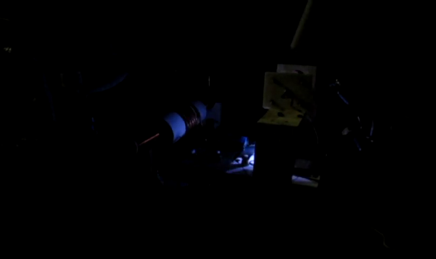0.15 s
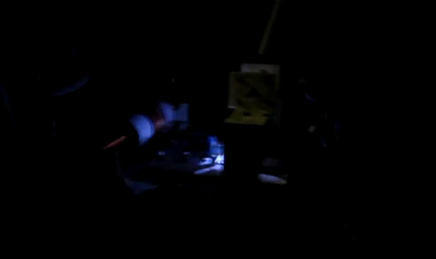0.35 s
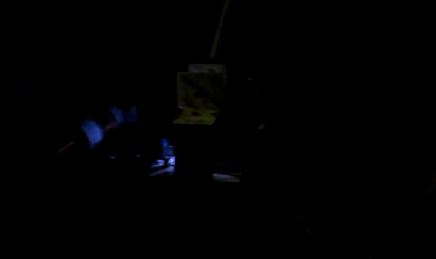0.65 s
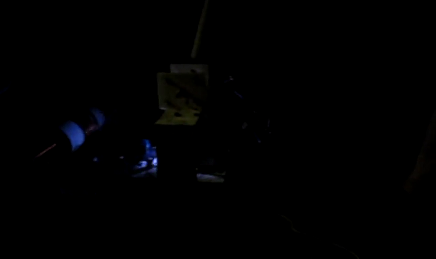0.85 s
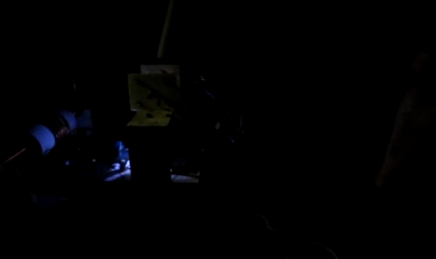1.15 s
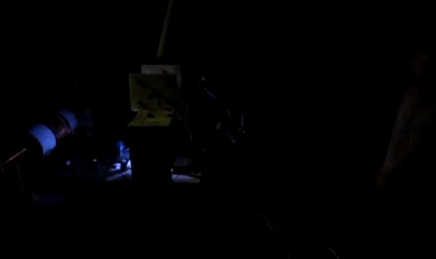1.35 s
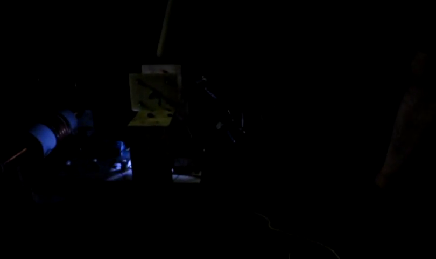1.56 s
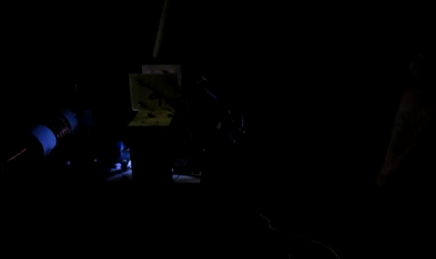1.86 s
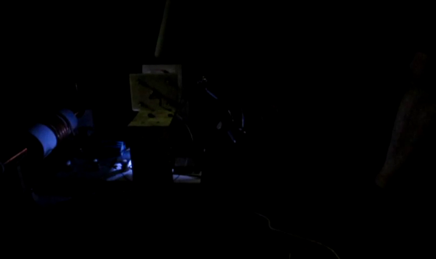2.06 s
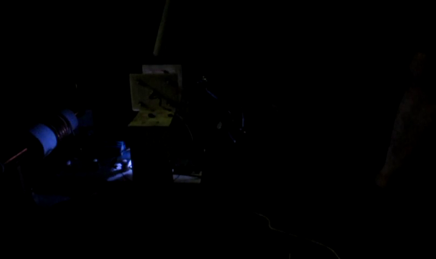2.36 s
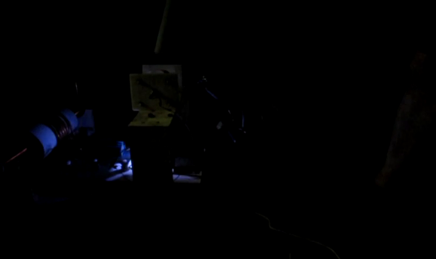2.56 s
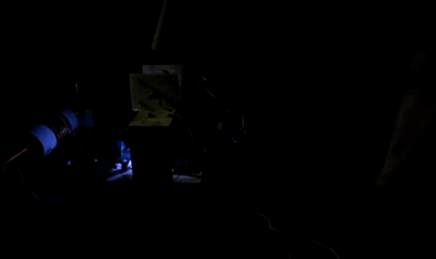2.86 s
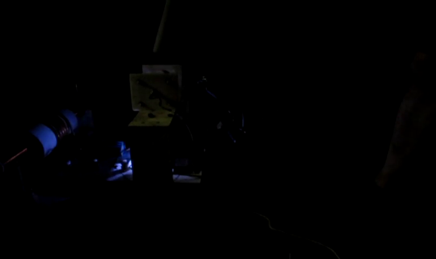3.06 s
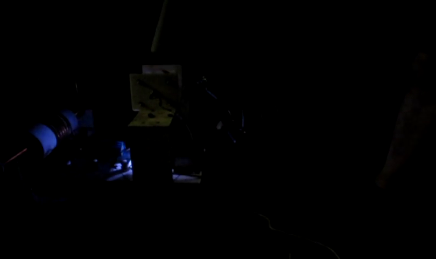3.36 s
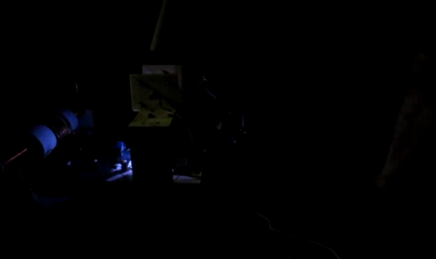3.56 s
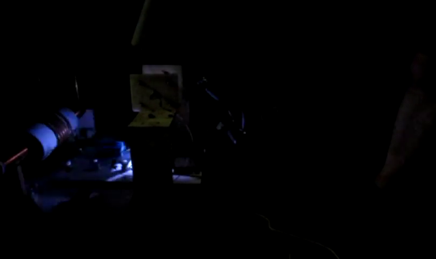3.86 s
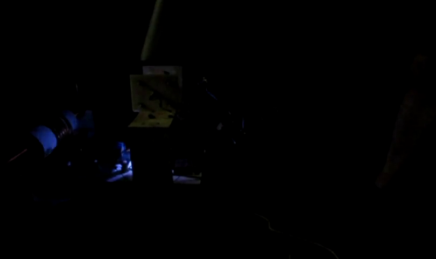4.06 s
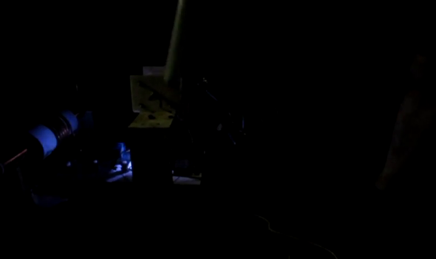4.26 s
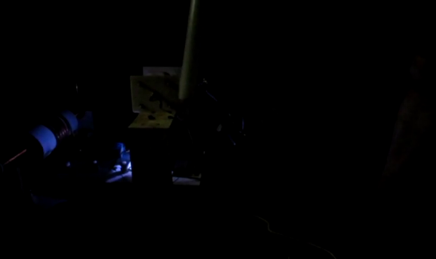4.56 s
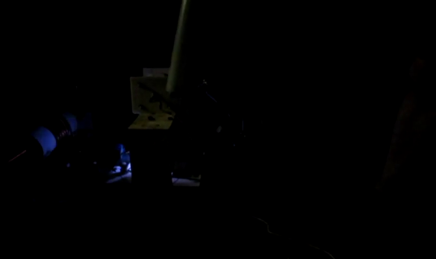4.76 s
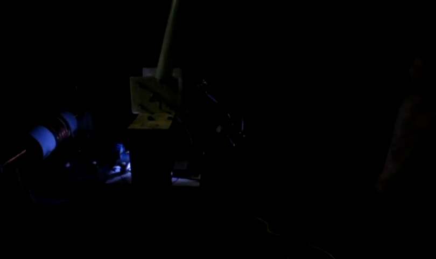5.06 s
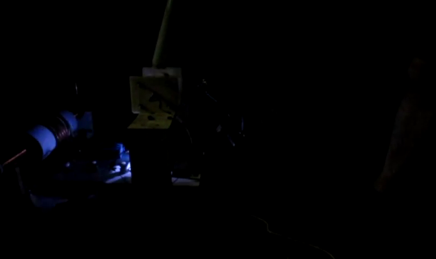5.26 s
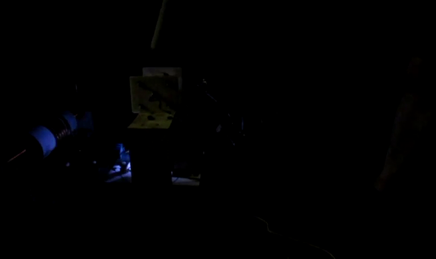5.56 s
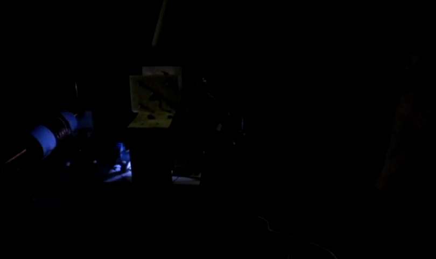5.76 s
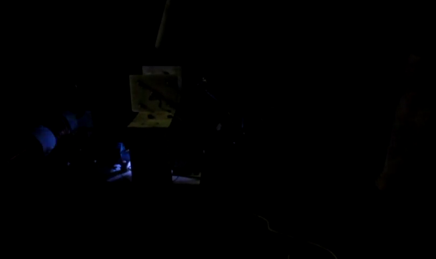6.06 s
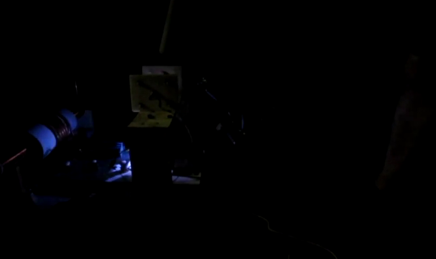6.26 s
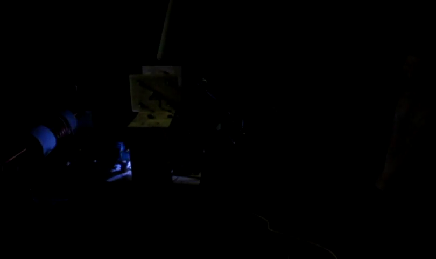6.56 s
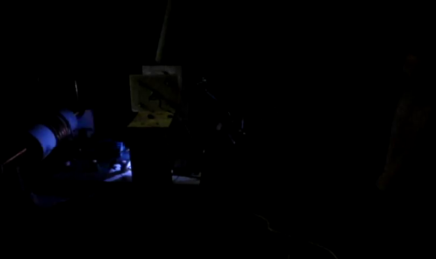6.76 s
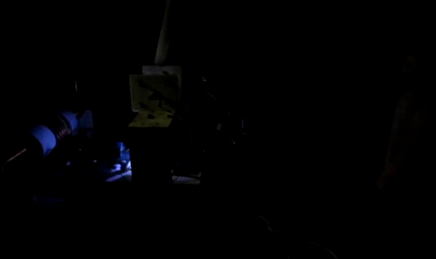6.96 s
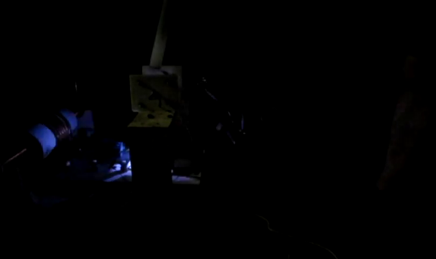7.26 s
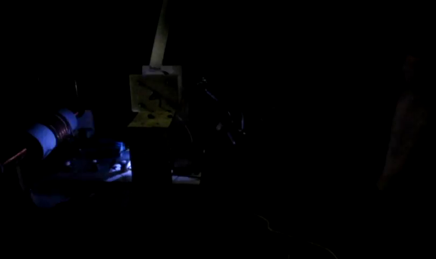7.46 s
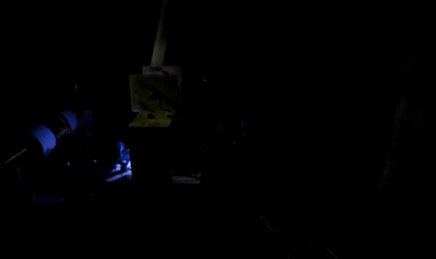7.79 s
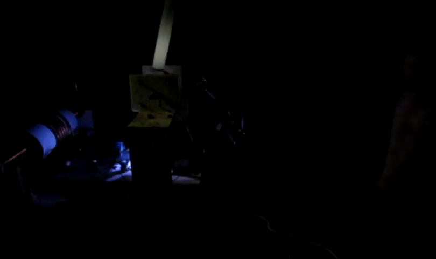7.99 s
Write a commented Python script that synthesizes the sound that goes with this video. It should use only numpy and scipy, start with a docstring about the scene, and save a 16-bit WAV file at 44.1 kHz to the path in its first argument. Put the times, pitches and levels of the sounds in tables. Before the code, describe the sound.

From 0 to about 8.1 seconds, an electrical discharge sizzles continuously, already running at the start and cut off still running. Each mains cycle, sixty per second, brings about three tiny sharp cracks in two groups, blurred by bench echoes and a short small-room tail into a harsh, bright, buzzing hiss. Energy lies mostly from 3 to 12 kilohertz, with little bass. The level is nearly steady, but tiny flurries of extra snaps, under a tenth of a second, roughen it, as near 0.6, 1.9, 2.5 and 2.75 seconds. Small dips come between, notably near 1.4. Around 4.95 to 5.4 the crackle thickens and its rhythm shifts slightly; flurries are frequent from 6 to 7.9, with another rhythm shift near 7.85. Very faint hum, patchy low noise and two soft microphone bumps near 5.0 and 5.3 are virtually masked. Close, moderately wide stereo.

```python
"""In a small room, a mains-fed spark gap fires on a bench before a microphone.
Each half of the mains cycle breaks the gap down, and restrikes may follow a millisecond or so later.
Every spark is an impulse shaped into a short N-like crack; bench echoes, resonances and decaying noise
blur the cracks into a buzzing sizzle. Wavering sines make a faint hum at mains harmonics, over patchy
low noise, and two soft bumps reach the microphone body."""
import sys
import numpy as np
from scipy import signal
from scipy.fft import rfft, irfft, next_fast_len
from scipy.io import wavfile
from scipy.ndimage import uniform_filter1d

SR = 44100
rng = np.random.default_rng(int(sys.argv[2]) if len(sys.argv) > 2 else 0)


def materialize(psi):
    """Save the field psi as 16-bit PCM at rate SR to the path in sys.argv[1].

    A 1-D psi becomes a single channel; in a 2-D psi each row is a channel.
    """
    bounded = np.clip(np.atleast_2d(psi).T, -1, 1)
    quanta = np.round(bounded * 32767).astype(np.int16)
    wavfile.write(sys.argv[1], SR, quanta)


N = 358524

# Low tones at mains harmonics, centre levels: pitch_hz, level_db (rms)
HUM_LINES = [(180, -87.5), (240, -90), (300, -75), (360, -74), (540, -65)]
# Lowest hum line, which comes and goes: time_s, level_db (rms)
LOW_HUM_LEVEL = [(0.0, -90), (0.32, -84), (0.38, -103), (0.61, -78), (0.84, -108), (0.88, -83), (1.81, -84),
                 (2.2, -76), (2.24, -101), (2.35, -76), (3.21, -80), (3.28, -109), (3.37, -79), (4.94, -83),
                 (4.98, -73), (5.3, -87), (6.29, -81), (6.36, -110), (6.52, -87), (7.88, -80), (8.04, -110),
                 (8.13, -86)]
LOW_HUM_HZ = 120
HUM_WAVER_DB, LOW_HUM_WAVER_DB, HUM_ROUGH_TURNS = 4.5, 1.8, .16  # turns of phase
FLOOR_DB, FLOOR_PATCHY_DB = -86.5, 20  # upper rms level of a noise band; depth of its drops

# Soft bumps on the microphone body: centre_s, pitch_hz, peak_db, length_s (between 1/e points)
SOFT_BUMPS = [(5.01, 85, -69, .08), (5.34, 50, -74, .06)]

# Bench and apparatus echoes: delay_ms, left_gain, right_gain (relative)
BENCH_ECHOES = [(0.0, 1.14, 1.16), (0.215, 0.44, 0.35), (0.42, 0.23, 0.15), (0.519, 0.24, 0.29),
                (0.944, -0.2, -0.32), (1.032, -0.17, -0.4), (1.154, 0.32, 0.53), (1.426, -0.26, -0.23),
                (1.562, 0.22, 0.22), (1.967, -0.41, -0.42), (2.117, -0.5, -0.42), (2.304, 0.3, 0.33),
                (2.443, 0.19, 0.27), (2.8, 0.21, 0.34), (3.03, 0.26, 0.24), (3.645, 0.27, 0.24),
                (4.785, -0.18, -0.21), (6.276, -0.18, -0.2)]
# Diffuse sound before the stereo width is set: pitch_hz, side_minus_mid_db
DIFFUSE_SIDE = [(100, -8), (300, -11), (600, -9), (1300, -12), (1800, -5), (2400, 2), (4400, -4.5),
                (8000, -5), (15000, -4.5)]
# Broad width of the whole spark sound: pitch_hz, side_minus_mid_db
STEREO_WIDTH = [(60, -10), (200, -11), (380, -15), (700, -14), (1290, -11), (1650, -14), (2300, -1),
                (3800, -3), (4700, -8), (8100, -8), (15000, -8)]
# Broad stereo balance of the spark sound: pitch_hz, left_minus_right_db
STEREO_BALANCE = [(1500, -.2), (2400, -1.2), (4000, -.2)]
# Resonances and notches: pitch_hz, width_hz, level_db
RESONANCES = [(325, 71, 9.5), (383, 26, 6), (426, 50, -21), (520, 320, 0), (635, 26, -12.5), (840, 71, 5.5),
              (1075, 43, 3), (1485, 49, -1.5), (1581, 155, 6.5), (2270, 170, 3.5), (2312, 44, -15.5),
              (2640, 130, 2.5), (2982, 110, -9.5), (3110, 56, 2), (4100, 43, -5.5), (4415, 230, 3.5),
              (5360, 140, 5), (5640, 92, -8.5), (6820, 250, 0), (6840, 80, 2.5), (7855, 240, 7),
              (7970, 75, -8), (8300, 120, 2), (8520, 120, -5), (9620, 270, 3.5), (12300, 100, -1),
              (13700, 550, 5.5)]
# Relative spectrum of an arriving spark: pitch_hz, level_db
CRACK_SPECTRUM = [(40, -80), (100, -70), (240, -50), (290, -43), (500, -24), (1000, -20), (1500, -18),
                  (2000, -14), (3000, -7.5), (4500, -4.5), (6000, -3), (8000, -3), (10000, -3), (12000, -6),
                  (14000, -8.5), (15700, -8)]
# Diffuse levels are relative to the echo gains
CLUTTER_DB, CLUTTER_T60_S = -28, .045
ROOM_DB, ROOM_T60_S = -23.5, .18
DIFFUSE_RISE_S = .001
SPOTS = 8  # places on the electrodes where a spark may strike
SPOT_SHARE, TAIL_SPOT_SHARE = .6, .3  # power shares of clutter and tail that differ by spot
MODE_SHIFT, MODE_DEPTH_SPREAD = .15, .15  # by spot: in resonance widths; as a share of level_db
EVEN_HZ = 160  # echoes ripple the spectrum only more finely than this
COLOUR_HZ = (160, 230, 330, 470, 680, 1000, 1500, 2300, 3500, 5500, 9000)  # bands that surge and sink
COLOUR_DRIFT_DB, BASS_DRIFT_DB, BASS_HZ = .4, 7, 300  # bands below BASS_HZ flicker more

MAINS_HZ = 60.015
# Usual first breakdown in each half of the mains cycle: first_half_ms, second_half_ms
BREAKDOWN_MS = (1.65, 12.55)
# Usual spark power: time_s, power_db
GAP_POWER = [(0, -19.5), (.3, -21.5), (.55, -20), (.8, -21), (1.1, -20), (1.45, -19.5), (1.75, -20),
             (2.1, -19), (2.5, -20), (2.9, -20), (3.2, -19.5), (3.55, -19), (3.85, -19), (4.1, -20.5),
             (4.4, -20), (4.7, -19), (4.9, -19), (5.2, -20), (5.6, -20.5), (5.9, -20.5), (6.2, -20.5),
             (6.5, -21), (6.8, -20.5), (7.1, -19), (7.4, -20), (7.8, -21), (8.13, -19.5)]
# First half strikes later and second half earlier by: time_s, lag_ms
STRIKE_LAG = [(0, .3), (.8, .1), (4.9, 0), (5.05, 1.4), (5.25, 2.6), (5.45, .4), (5.6, 0), (7.6, .2),
              (7.85, 2.0), (8.0, .3), (8.13, .3)]
# Spells of altered power; those above 1 dB also bring many restrikes: start_s, length_s, rise_db
FLURRY_SPELLS = [(.033, 0.029, 1), (.142, 0.028, 1.5), (.267, .03, 1), (.45, 0.023, 1.5),
                 (.567, 0.029, 2.5), (.765, 0.018, 0.5), (.9, .02, -0.5), (.983, 0.026, 2),
                 (1.57, 0.079, 0.5), (1.883, 0.047, 2), (1.966, 0.015, 0), (2.499, 0.04, 2.5),
                 (2.749, 0.016, 3), (2.8, .035, 1), (3.43, 0.037, 0.9), (3.53, 0.037, 0.1),
                 (3.566, 0.014, 2), (3.682, 0.016, 2.5), (3.74, 0.02, 1), (3.916, 0.054, 1),
                 (4.032, 0.013, 1.5), (4.065, 0.019, 1), (4.115, .017, 1.5), (4.345, 0.018, 2),
                 (4.95, 0.027, 2.6), (4.98, 0.059, 2.5), (5.215, 0.044, 2), (5.332, 0.045, 1.5),
                 (5.4, 0.045, 2), (5.51, .03, 1), (5.565, 0.015, 1.5), (6.05, 0.043, 1.5),
                 (6.215, 0.043, 3), (6.282, 0.052, 1), (6.348, 0.035, 2.5), (6.54, 0.023, 2.5),
                 (6.598, 0.026, 1.5), (6.81, .02, 1), (6.848, 0.043, 1.5), (7.198, 0.031, 1),
                 (7.348, 0.046, 1), (7.531, 0.046, 2), (7.598, 0.014, 3), (7.748, 0.029, 1.5),
                 (7.831, 0.032, 2), (8.065, 0.034, 1)]
# Short dips in the level of the sizzle: start_s, length_s, drop_db
DIP_SPELLS = [(.49, 0.045, 0.5), (.55, 0.024, 3), (.617, 0.073, 2.5), (1.316, 0.046, 2), (1.383, 0.024, 5),
              (1.7, 0.091, 1.5), (2.249, 0.04, 2), (2.349, 0.039, 1.5), (2.616, 0.039, 0.5),
              (2.699, 0.064, 2), (2.849, 0.029, 0.5), (2.999, 0.037, 1), (3.215, 0.027, 2),
              (3.71, 0.027, 1.5), (3.766, 0.025, 3), (3.866, 0.044, 2.5), (3.966, 0.063, 1),
              (4.549, 0.034, 3), (4.76, 0.029, 3), (5.099, 0.032, 0), (5.14, 0.041, 1.5), (5.449, .033, 0),
              (5.682, 0.045, 2), (5.782, 0.05, 2), (5.948, 0.074, 1.5), (6.098, 0.06, 1),
              (6.715, 0.09, 2.5), (6.915, 0.055, 2.5), (7.065, 0.089, 3.3), (7.498, 0.028, 0),
              (7.681, 0.049, 0.5), (7.798, 0.025, -0.5), (7.948, 0.099, 1)]
POWER_SCATTER_DB = .49  # from one mains cycle to the next
SPARKS_PER_CYCLE, SPARKS_SCATTER = 3.0, .6
SPARKS_FOLLOW_POWER = .6  # dB of spark count per dB of power
FLURRY_SPARKS_PER_DB = 1.7
RESTRIKE_MS, RESTRIKE_SPREAD = 1.25, .45  # median wait; spread of its natural logarithm
STRIKE_JITTER_MS = .26
SIZE_SCATTER_DB, RESTRIKE_DB = 1.2, -1.6  # a restrike is weaker than the first strike
SPOT_STAY = .4  # chance of striking the settled spot; otherwise any spot is drawn
SPOT_MOVES_PER_S = 6  # settled spot redrawn at this rate

TOP_HZ = 15720
CEILING = 1.1  # peaks are rounded towards this amplitude


def undb(db):
    """Amplitude ratio: 20 dB is a factor of ten."""
    return 10 ** (np.asarray(db) / 20)


def curve(table, s):
    """Piecewise-linear interpolation in time."""
    return np.interp(s, *np.transpose(table))


def colour(table, hz):
    """Spectral gain: decibels interpolated on a log-frequency axis."""
    f, db = np.transpose(table)
    return undb(np.interp(np.log(hz + 1), np.log(f), db))


def clicks(s, size, count):
    """Band-limited impulses: windowed sincs place each one between samples."""
    out = np.zeros(count)
    at = np.round(s * SR).astype(int)[:, None] + np.arange(-8, 9)
    off = at - s[:, None] * SR
    pulse = size[:, None] * np.sinc(off) * np.cos(np.pi * off / 18) ** 2
    inside = (at >= 0) & (at < count)
    np.add.at(out, at[inside], pulse[inside])
    return out


def walk(rate):
    """Random modulation: linear glides between normal levels set 1 / rate s apart."""
    step = int(SR / rate)
    held = np.repeat(rng.standard_normal(N // step + 1), step)
    return uniform_filter1d(held, step)[:N]


def spells(table, s):
    """Superposition in dB of the spells under way; edges fade over one mains cycle."""
    start, length, db = np.transpose(table)[..., None]
    inside_s = length / 2 - abs(s - start - length / 2)
    return (db * np.clip(inside_s * MAINS_HZ + .5, 0, 1)).sum(axis=0)


def low_noise():
    """Band-filtered noise: four low bands, nearly alike left and right, drop out independently."""
    air = 0
    for lo, hi in ((45, 90), (90, 140), (140, 200), (200, 270)):
        band = signal.butter(3, [lo, hi], "band", fs=SR, output="sos")
        mid, side = signal.sosfilt(band, rng.standard_normal((2, N)))
        stereo = (mid + .17 * side * np.array([[1], [-1]])) / mid.std()
        level_db = FLOOR_PATCHY_DB * np.minimum(walk(11), 0)
        if lo < 90:
            level_db = level_db - 9
        air = air + undb(level_db) * stereo
    return undb(FLOOR_DB) * air


def hum():
    """Mains harmonics: sines roughened by phase modulation and wavering in level."""
    t = np.arange(N) / SR
    lines = 0
    for hz, db in HUM_LINES:
        level = undb(db + HUM_WAVER_DB * np.minimum(walk(8.4), .8))
        lines = lines + level * np.sin(2 * np.pi * (hz * t + HUM_ROUGH_TURNS * walk(30)))
    level = undb(curve(LOW_HUM_LEVEL, t) + LOW_HUM_WAVER_DB * walk(9.1))
    low_line = level * np.sin(2 * np.pi * (LOW_HUM_HZ * t + HUM_ROUGH_TURNS * walk(20)))
    return np.sqrt(2) * (lines + low_line)  # a sine's peak is sqrt(2) times its rms


def bumps():
    """Gaussian envelopes on low sines make short soft thuds."""
    t = np.arange(N) / SR
    out = 0
    for centre, hz, db, length in SOFT_BUMPS:
        swell = np.exp(-(2 * (t - centre) / length) ** 2)
        out = out + undb(db) * swell * np.sin(2 * np.pi * hz * t)
    return out


def diffuse(count, clutter_share, tail_share):
    """Exponential decay of scattered sound: left and right spectra of bench clutter and room tail."""
    age = np.arange(count) / SR
    clutter = np.sqrt(clutter_share) * undb(CLUTTER_DB - 60 * age / CLUTTER_T60_S)
    tail = np.sqrt(tail_share) * undb(ROOM_DB - 60 * age / ROOM_T60_S)
    rise = np.clip(age / DIFFUSE_RISE_S, 0, 1) ** 2
    mid, side = rfft((clutter + tail) * rise * rng.standard_normal((2, count)))
    side = side * colour(DIFFUSE_SIDE, np.fft.rfftfreq(count, 1 / SR))
    return np.array([mid + side, mid - side])


def crack(hz, shift, depth):
    """N-like wave: a quarter-turn of phase makes the pulse odd, and resonances colour it."""
    modes_db = 0
    for (f, width, db), a, b in zip(RESONANCES, shift, depth):
        modes_db = modes_db + b * db / (1 + (2 * (hz - f - a * width) / width) ** 2)
    return 1j * colour(CRACK_SPECTRUM, hz) * undb(modes_db)


def sizzle_drift(spectra, hz, count, lead):
    """Spectral modulation: overlapping bands surge and sink independently."""
    out = 0
    for f, corner in zip(COLOUR_HZ, np.eye(len(COLOUR_HZ))):
        band = np.interp(np.log(hz + 1), np.log(COLOUR_HZ), corner)
        drift_db = BASS_DRIFT_DB if f < BASS_HZ else COLOUR_DRIFT_DB
        sound = irfft(spectra * band, count)[:, lead:lead + N]
        out = out + undb(drift_db * walk(10)) * sound
    return out


def room(trains):
    """Convolution with the paths from each spot: shared echoes, partly shared diffuse sound."""
    count = next_fast_len(N + SR)
    hz = np.fft.rfftfreq(count, 1 / SR)
    ms, left, right = np.transpose(BENCH_ECHOES)
    lead = 16  # samples of room for the first sinc, removed afterwards
    early = rfft([clicks(lead / SR + ms / 1000, g, count) for g in (left, right)])
    common = early + diffuse(count, 1 - SPOT_SHARE, 1 - TAIL_SPOT_SHARE)
    paths = []
    for _ in trains:
        left, right = common + diffuse(count, SPOT_SHARE, TAIL_SPOT_SHARE)
        paths.append(np.array([left + right, left - right]))  # mid and side

    # Level the paths' broad spectrum, so that the crack and width tables set it
    width = int(EVEN_HZ / hz[1])
    power = sum(abs(p) ** 2 for p in paths)
    broad = uniform_filter1d(uniform_filter1d(power, width), width)

    shift, depth = rng.standard_normal((2, len(trains), len(RESONANCES)))
    out = 0
    for train, path, a, b in zip(trains, paths, shift, depth):
        colouring = crack(hz, MODE_SHIFT * a, 1 + MODE_DEPTH_SPREAD * b)
        out = out + rfft(train, count) * path * colouring
    mid, side = out / np.sqrt(broad)
    side = side * colour(STEREO_WIDTH, hz)
    out = np.array([mid + side, mid - side])
    out = out * colour(STEREO_BALANCE, hz) ** np.array([[.5], [-.5]])
    out = sizzle_drift(out, hz, count, lead)
    # Give the sound the mean power of the spark trains
    return out * np.sqrt(np.mean(sum(trains) ** 2) / np.mean(out ** 2))


def sparks():
    """Gap breakdown: each half-cycle strikes and may restrike; one impulse train for each spot."""
    cycles = int(N / SR * MAINS_HZ) + 1
    start = np.arange(cycles) / MAINS_HZ
    middle = start + .5 / MAINS_HZ
    lag = curve(STRIKE_LAG, start) / 1000
    flurry_db = spells(FLURRY_SPELLS, middle)
    power_db = curve(GAP_POWER, middle) + flurry_db - spells(DIP_SPELLS, middle)
    power_db = power_db + POWER_SCATTER_DB * rng.standard_normal(cycles)

    # Sparks in each cycle: more with power, and many more in flurries
    total = SPARKS_PER_CYCLE * undb(SPARKS_FOLLOW_POWER * (power_db - power_db.mean()))
    total = np.clip(np.round(total + SPARKS_SCATTER * rng.standard_normal(cycles)), 2, 5)
    flurry_total = np.round(SPARKS_PER_CYCLE + FLURRY_SPARKS_PER_DB * flurry_db) * (flurry_db > 1)
    total = np.maximum(total, flurry_total).clip(2, 12)
    # An odd spark goes to the first half
    count = np.stack([np.ceil(total / 2), np.floor(total / 2)], axis=1)

    # Axes: cycle, half, spark; a second half that restrikes starts early
    early = (count[:, 1] - 1) * RESTRIKE_MS / 3000
    first = np.array(BREAKDOWN_MS) / 1000 + np.stack([lag, -lag - early], axis=1)
    time_chance, size_chance = rng.standard_normal((2, cycles, 2, 6))
    wait = RESTRIKE_MS / 1000 * np.exp(RESTRIKE_SPREAD * time_chance)
    wait[..., 0] = STRIKE_JITTER_MS / 1000 * time_chance[..., 0]
    s = start[:, None, None] + first[..., None] + np.cumsum(wait, axis=2)

    # Sparks share the power, evened over three cycles
    order = np.arange(6)
    fires = order < count[..., None]
    size = undb(SIZE_SCATTER_DB * size_chance + RESTRIKE_DB * (order > 0)) * fires
    spent = uniform_filter1d((size ** 2).sum(axis=(1, 2)), size=3)
    size = size * (undb(power_db) / np.sqrt(spent))[:, None, None]

    settled = rng.integers(0, SPOTS, cycles)[(start * SPOT_MOVES_PER_S).astype(int), None, None]
    stays = rng.random(s.shape) < SPOT_STAY
    spot = np.where(stays, settled, rng.integers(0, SPOTS, s.shape))
    spot = np.where(fires, spot, -1)
    scale = np.sqrt(SR / MAINS_HZ)  # power per cycle becomes mean square per sample
    return [clicks(s[spot == k], size[spot == k], N) * scale for k in range(SPOTS)]


def scene():
    """Superposition of hum, low noise, bumps and the sparks heard in the room."""
    return low_noise() + hum() + bumps() + room(sparks())


def record(dry):
    """Saturation and band-limiting: the input rounds the loudest cracks and cuts the top."""
    rounded = CEILING * np.tanh(dry / CEILING)
    lowpass = signal.ellip(14, .2, 80, TOP_HZ, fs=SR, output="sos")
    return signal.sosfilt(lowpass, rounded)


dry = scene()
out = record(dry)
materialize(out)
```